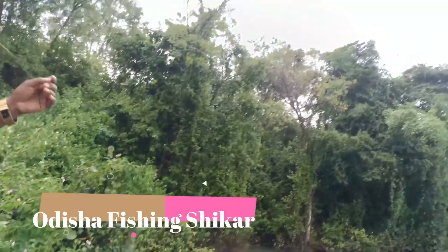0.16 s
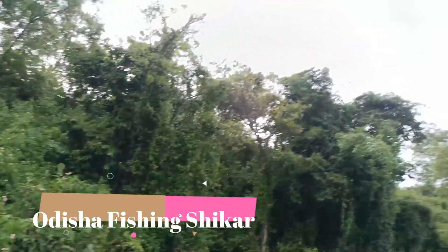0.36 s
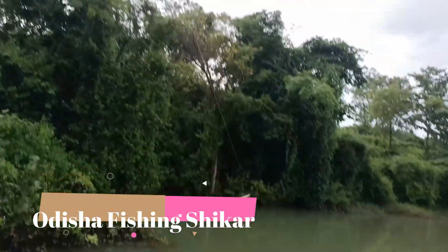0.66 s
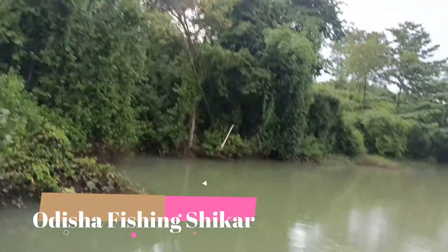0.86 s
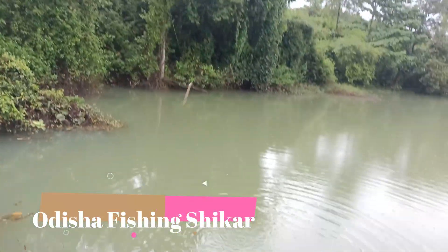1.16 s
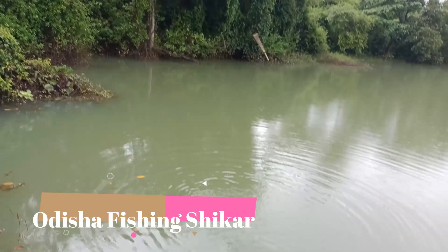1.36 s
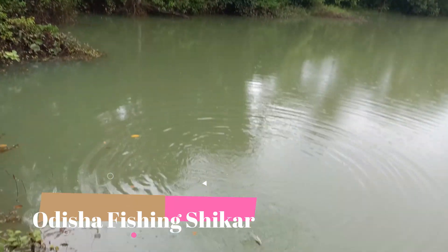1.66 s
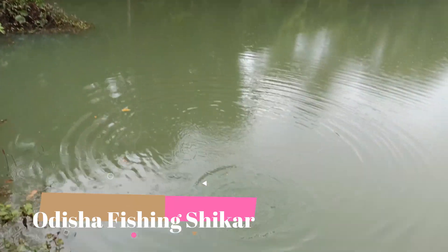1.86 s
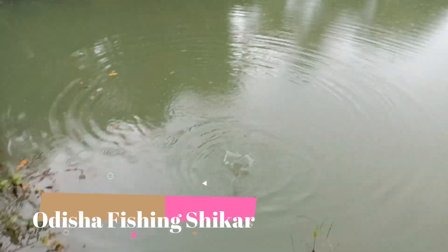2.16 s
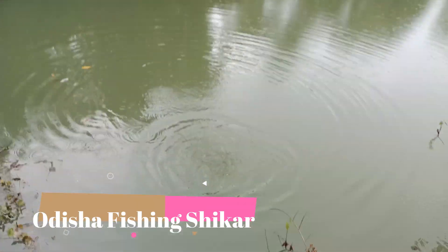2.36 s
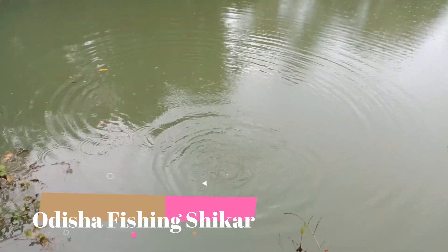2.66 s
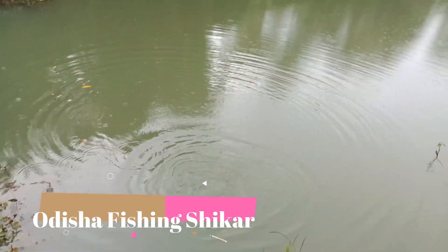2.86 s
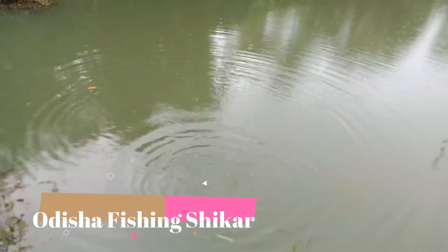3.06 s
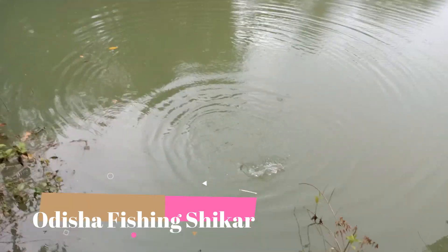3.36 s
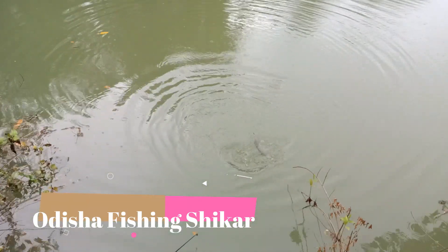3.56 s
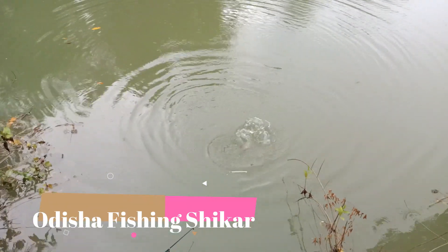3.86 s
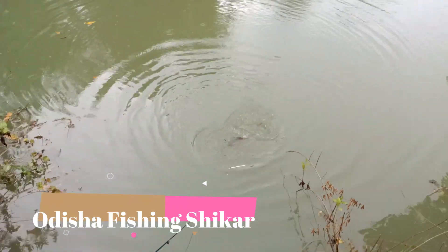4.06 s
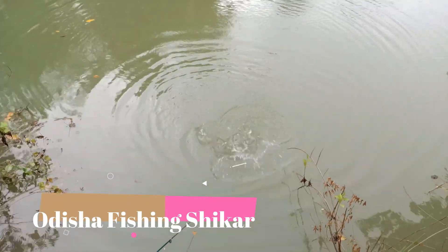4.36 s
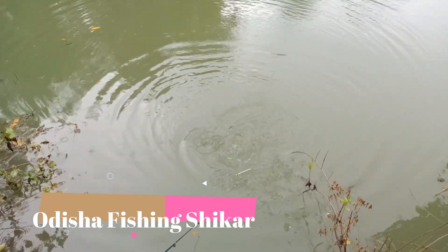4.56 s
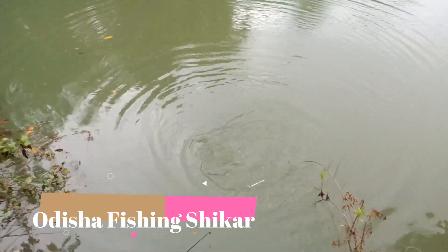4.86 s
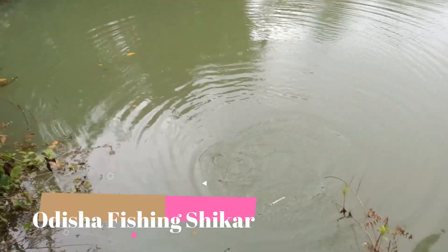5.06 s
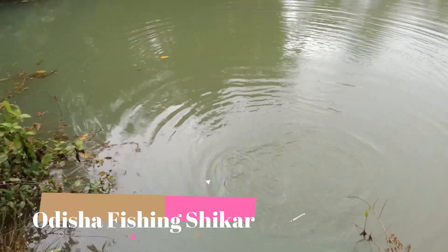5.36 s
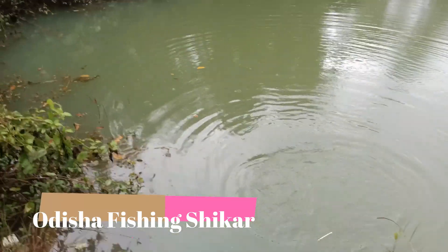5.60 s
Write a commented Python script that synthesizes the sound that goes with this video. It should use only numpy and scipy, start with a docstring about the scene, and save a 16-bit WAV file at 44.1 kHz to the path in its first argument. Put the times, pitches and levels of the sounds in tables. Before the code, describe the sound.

A hooked fish splashes and bubbles, line crackles, then a near reel ratchets in a rapid, uneven metallic buzz over a faint distant engine.

```python
"""Behind everything lie a river's filtered-noise hush and a far engine: a train of dull exhaust puffs. First a
hooked fish splashes (grainy noise bursts, ringing bubbles) while a fine crackle flares and tackle ticks. Then a
near fishing reel buzzes: each ratchet tooth gives a noise snap, a top-octave sizzle and body modes. The spool
surges and slackens pull by pull, and the levels swing with each turn. Soon something bumps the left microphone
and gusts brush the ports; the fish thrashes again under the buzz."""
import sys
import numpy as np
from scipy import signal
from scipy.fft import rfft, irfft, next_fast_len
from scipy.io import wavfile

SR = 44100
rng = np.random.default_rng(int(sys.argv[2]) if len(sys.argv) > 2 else 0)


def bounce(signal):
    """Save signal as a 16-bit WAV file at the path given by the first command-line argument."""
    frames = np.transpose(np.atleast_2d(signal))
    limited = np.clip(frames, -1, 1)
    pcm = np.round(limited * 32767).astype(np.int16)
    wavfile.write(sys.argv[1], SR, pcm)


N = 252693  # length [samples]

# Pulls on the line, each lasting until the next: (start [s], top speed [teeth/s], lean [above 1 builds
# slowly], left snap [dB], right snap [dB], sizzle [dB], low ring [dB], high ring [dB])
PULLS = [(1.491, 126.2, 1.17, -35, -38.5, -46, -39, -40), (1.666, 159.5, 0.64, -37, -36, -41, -37, -41),
         (1.79, 189.2, 1.64, -37.5, -37.5, -46, -39, -36.5),
         (1.949, 167.1, 1.46, -33.5, -34, -41.5, -35.5, -36), (2.088, 225.9, 1.6, -39, -38, -38, -32, -35),
         (2.209, 180.4, 1.48, -33, -34, -40, -40, -34.5), (2.368, 189.7, .8, -33.5, -27, -56, -35.5, -34),
         (2.598, 213.1, 0.7, -36, -26.5, -47, -41, -35), (2.771, 228.7, 1.65, -32, -26, -37, -35.5, -34.5),
         (2.968, 201.3, 1.98, -32.5, -27, -30, -40, -36.5), (3.11, 171.9, 0.58, -33, -28, -38, -38.5, -44),
         (3.243, 183.2, 2.03, -32, -27, -58, -40.5, -36.5),
         (3.407, 205, 0.82, -32.5, -26.5, -53, -35, -44.5), (3.509, 188.4, 2.02, -34.5, -29, -58, -43, -39),
         (3.685, 167.6, .62, -35, -27, -58, -44.5, -44.5),
         (3.807, 166.4, 1.55, -34.5, -29.5, -53, -35, -38.5),
         (3.945, 186.8, 0.67, -35.5, -25.5, -59, -36.5, -45),
         (4.09, 171.1, 1.45, -33, -28, -65, -38.5, -39.5),
         (4.209, 181.3, .79, -32.5, -28.5, -56, -39, -46.5),
         (4.32, 173.2, .46, -33.5, -29.5, -61, -36.5, -39), (4.478, 175.9, .68, -36, -28, -45, -35, -41),
         (4.674, 144.5, 0.79, -33, -30, -55, -37, -39.5), (4.765, 197.5, 0.76, -31, -27.5, -57, -31, -42.5),
         (4.924, 156.7, 0.95, -31, -29.5, -53, -34, -41),
         (5.073, 168.1, 0.71, -35, -31.5, -33.5, -30.5, -38.5),
         (5.32, 197, 0.64, -34.5, -33, -38, -32, -36), (5.44, 137.1, 1.17, -36, -34.5, -31, -39, -34.5),
         (5.691, 146.6, .78, -34, -36, -34, -33, -38)]
LAST_PULL_ENDS_S, SPIN_UP_S = 5.8, .028  # the spool starts from rest
SLACK_TEETH_PER_S, PULL_SHAPE = 92, .6  # the shape is an exponent on the effort
# Moments at which the reel begins a new turn: time [s]
TURN_STARTS = [1.596, 1.965, 2.259, 2.457, 2.723, 2.979, 3.255, 3.52, 3.795, 4.088, 4.347, 4.618, 4.889,
               5.173, 5.452, 5.767]
# Variation of left snap, right snap, sizzle, low ring and high ring, one row each: (change when slack [dB],
# once-a-turn swing [dB], its crest [turns], twice-a-turn swing [dB], its crest [turns])
SWINGS = [(-2.5, 3, 0.51, 0.66, 0.25), (-2.5, 0.5, .51, 0.5, 0.24), (-2.3, 0, 0.88, -0.5, 0.34),
          (-3.5, 1.55, 0.91, 1.4, 0.4), (-2, 1.35, 0.23, 0.8, 0.26)]
# Moments when the pawl bites differently: (time [s], right snap change [dB], sizzle change [dB])
BITES = [(1.72, 2.5, 1), (2.135, 5, -10), (2.335, 3, 0), (2.554, 3.5, 6), (2.645, 5.5, 1), (2.792, 3, 1),
         (2.925, 6, 5), (3.025, 2.5, -2), (3.182, 4.5, 9.5), (3.32, 2.5, 4), (3.442, 5, 0), (3.64, 2.5, 4),
         (3.915, 1, 0), (4.02, 1.5, 0), (4.19, 2.5, 0), (4.46, 5, 2), (4.67, 4.5, 1), (4.945, 7, 0),
         (5.11, 1, 9), (5.255, 1.5, 9.5), (5.375, -2, 11.5)]
BITE_WIDTH_S = 0.018
# Spectrum of the pawl's snap at each microphone: (frequency [Hz], relative gain [dB])
SNAP_LEFT = [(200, -28), (450, -30), (800, -26), (2400, -8), (3900, -6), (5400, -9), (6900, -18),
             (8100, -3), (9500, -.5), (11000, -4), (12500, -2), (13600, -10), (14600, -16)]
SNAP_RIGHT = [(200, -29), (450, -32), (900, -28), (2500, -11), (3200, -14), (3800, -9.5), (4250, -3),
              (4700, -3.5), (5300, 0), (7250, 1), (8100, -11), (9800, -22), (11600, -10), (13000, -9),
              (14500, -9), (15200, -5)]
# Vibration modes of the reel's body: (frequency [Hz], relative level [dB], t60 [s])
BODY_MODES = [(1025, -20, 0.027), (1180, -17.5, 0.028), (1478, -8, 0.016), (1658, -4.5, .016),
              (1904, -2, .019), (2086, -8.5, 0.017), (2303, -15.5, 0.032), (2750, -15, 0.017),
              (3630, -14.5, 0.0028), (4254, -19.5, 0.013)]
RING_SPLIT_HZ = 1750  # the low ring lies below, the high ring above
RING_WANDER_DB, RING_DRIFT_HZ = 1.5, 37.5  # smooth random wander of each mode's level and pitch
TOOTH_DETUNE_HZ = 26.8  # random spread of pitch from tooth to tooth
# How the reel is held: (time [s], ring level left minus right [dB])
GRIP = [(1.5, -1), (4.0, -1.5), (4.55, -0.5), (5.18, -0.5), (5.5, -5), (5.73, -2.5)]
# Small ticks of the tackle: (time [s], peak level [dB], centre [Hz])
TICKS = [(.394, -47, 6000), (.42, -48, 5500), (.446, -42, 1430), (.451, -50, 1400), (.475, -44, 6500),
         (.544, -49, 9000), (.556, -52, 7000), (.598, -44, 2400), (.635, -51, 10900), (.706, -49, 6500),
         (.716, -50, 5950), (0.747, -47, 3740), (1.039, -44, 6200), (1.322, -32, 1830), (1.362, -29, 2150),
         (2.98, -40, 1020), (3.156, -51, 700), (3.307, -33.5, 1014)]
TICK_T60_S = 0.013
# Flares of fine treble crackle: (time [s], crackle level [dB], t60 [s])
CRACKLES = [(.436, -54, 0.22), (.535, -59, .1), (.7, -57, 0.17), (.865, -59, 0.14), (1.07, -55, 0.84),
            (1.32, -39.5, 0.13), (1.355, -41.5, 0.19)]
CRACKLE_RISE_S = 0.012
# Spectrum of the crackle: (frequency [Hz], relative gain [dB])
CRACKLE_COLOUR = [(1000, -64), (3000, -11), (6500, 10), (10500, -8), (15000, -1)]
# Louder bubbles left by the fish: (time [s], pitch [Hz], relative level [dB], glide [octaves per t60], t60 [s])
BUBBLES = [(.522, 2000, -41, 0.1, .04), (.623, 414, -42, 0.1, 0.087), (.657, 810, -44, -0.15, 0.063),
           (.672, 1510, -41, 0, 0.036), (.71, 2630, -40, .02, 0.036), (.713, 1660, -32, .18, .023),
           (.731, 1510, -35.5, -0.1, 0.041), (.745, 3620, -45, 0, 0.043), (.752, 2880, -41, -0, 0.027),
           (.752, 2060, -45, -.05, .05), (0.981, 977, -33.5, 0.3, 0.033), (1.04, 470, -38.5, 0, 0.064),
           (1.051, 730, -37, .37, .043), (1.061, 910, -27.5, -0, 0.036), (1.066, 422, -39, -0.13, 0.12),
           (1.083, 890, -33, 0.13, 0.035), (1.118, 1670, -33, 0.07, .03), (1.147, 1090, -35, -0, 0.042),
           (1.238, 1400, -24.5, -0, 0.025), (1.329, 750, -25.5, -0.08, 0.038), (1.38, 2240, -23, 0.05, .02),
           (1.409, 1317, -25, 0.63, 0.034), (2.179, 762, -27, .33, 0.039), (2.203, 903, -29.5, 0.25, 0.03),
           (2.267, 1160, -30, .2, 0.035), (3.828, 633.2, -15.5, 0.27, 0.023), (3.848, 234.7, -40, 0, .04),
           (3.872, 738, -20.5, -0.01, .036), (3.872, 316, -28.5, -0.3, 0.091), (3.917, 545.7, -42, 0, .05),
           (3.966, 339, -39, 0.65, 0.087), (4.007, 609.4, -24, 0.28, 0.052), (4.04, 689, -28, 0.7, 0.049),
           (4.272, 651.6, -24, 0.3, 0.028), (4.332, 650, -42, 0.2, 0.048), (4.343, 1120, -32, .05, 0.031),
           (4.381, 690, -30.5, .1, 0.053), (4.402, 650, -28, 0.22, 0.036),
           (4.403, 333.7, -34.5, 0.08, 0.17), (4.432, 333, -36, .13, .08), (4.428, 607, -30, 0.17, 0.041),
           (4.471, 804, -19.5, -0.02, 0.031), (4.48, 642, -30, 0.14, 0.039),
           (4.56, 340.6, -43.5, .1, 0.043), (4.563, 879.7, -37.5, 0.09, 0.047)]
# Slaps and spray on the water: (time [s], relative level [dB], centre [Hz], t60 [s], rise [s])
SPLASHES = [(.444, -35.5, 1460, 0.1, 0.003), (.489, -54, 1465, 0.43, .022),
            (0.572, -51.5, 2480, 0.095, 0.029), (0.645, -55, 1254, 0.2, 0.028),
            (0.701, -59, 2820, 0.2, 0.025), (.834, -51, 220, 0.15, 0.036), (.955, -55, 1000, 0.085, 0.017),
            (1.047, -38.5, 894, 0.086, 0.023), (1.118, -49, 1720, 0.092, 0.0051),
            (1.228, -46.5, 1710, 0.07, 0.01), (1.268, -57, 1290, 0.14, .015),
            (1.425, -55.5, 1610, 0.29, .01), (1.324, -38, 1790, 0.053, 0.0051),
            (1.342, -46, 1930, 0.44, 0.0072), (1.361, -44.5, 2170, 0.11, 0.0018),
            (3.157, -37, 330, 0.032, .004), (3.307, -45, 748, 0.014, 0.0042),
            (3.828, -30.5, 612.5, 0.013, 0.0057), (3.872, -47, 626, 0.27, 0.0083),
            (3.975, -43.5, 688.2, 0.22, 0.016), (4.266, -42.5, 1114, 0.15, 0.014),
            (4.381, -45.5, 720, 0.17, 0.03), (4.475, -41.5, 910, 0.22, .0086)]
# A hollow between the deep plops and the gurgle: (frequency [Hz], gain [dB])
WATER_COLOUR = [(340, -0.5), (480, -7.5), (600, 0)]
# The distant engine: (time [s], firing rate [1/s], level before mixing tone and rasp [dB])
ENGINE = [(0, 15, -51.5), (.5, 15.5, -58.5), (1.5, 11.74, -59), (4.2, 12.5, -56.5), (5.73, 12.46, -55)]
# Spectrum of the exhaust's rasp: (frequency [Hz], relative gain [dB])
EXHAUST_COLOUR = [(30, -55), (70, -4.5), (105, 0.5), (140, -2), (190, -2), (300, -24.5), (800, -50)]
# The riverbank's hush: (time [s], level [dB])
HUSH = [(0, -48.5), (.22, -51.5), (.3, -55.5), (.8, -56.5), (5.73, -56.5)]
# Spectrum of the hush: (frequency [Hz], relative gain [dB])
AIR_COLOUR = [(50, -16), (150, -11.5), (400, -5.5), (1100, -8), (2100, -10), (3300, -28), (5000, -26.5),
              (8000, -36.5), (15800, -53)]
# Gusts on the microphone ports: (time [s], left level [dB], right level [dB])
GUSTS = [(2.791, -65, -40), (2.9, -49, -86)]
GUST_WIDTH_S, BREEZE_DB = 0.036, -64.5
TOP_HZ = 15850  # upper band limit


def amp(db):
    """Level law: decibels to amplitude gain."""
    return 10 ** (np.asarray(db) / 20)


def unit(x):
    """Normalisation: scale to rms 1."""
    return x / np.sqrt(np.mean(x ** 2) + 1e-20)


def curves(rows, when=None):
    """Linear interpolation: each column after the time, at given moments or at every sample."""
    s, *columns = np.transpose(rows)
    if when is None:
        when = np.arange(N) / SR
    return [np.interp(when, s, column) for column in columns]


def sides(db):
    """Intensity panning: left and right gains of constant total power for a level difference."""
    gains = amp(np.array([db, -db]) / 2)
    return gains / np.sqrt(np.mean(gains ** 2, axis=0))


def colour(x, points):
    """Minimum-phase filtering: a causal response through (frequency [Hz], gain [dB]) points."""
    size = 2 * next_fast_len(x.shape[-1])
    f, db = np.transpose(points)
    gain = amp(np.interp(np.log(np.fft.rfftfreq(size, 1 / SR) + 1), np.log(f), db))
    # folding the cepstrum onto positive time makes the filter causal
    cepstrum = irfft(np.log(gain))
    cepstrum[1:size // 2] *= 2
    cepstrum[size // 2 + 1:] = 0
    return irfft(rfft(x, size) * np.exp(rfft(cepstrum)))[..., :x.shape[-1]]


def place(times, sounds):
    """Superposition: sum stereo sounds (2, events, samples) at their moments."""
    starts = np.round(np.asarray(times) * SR).astype(int)[:, None]
    at = starts + np.arange(sounds.shape[-1])
    return np.array([np.bincount(at.ravel(), s.ravel(), N)[:N] for s in sounds])


def drift(times, rate, size):
    """Smoothed randomness: rows of random values that change smoothly, rate times a second."""
    knots = np.arange(int(N / SR * rate) + 2)
    weight = np.exp(-2 * (times[:, None] * rate - knots) ** 2)
    weight = weight / np.linalg.norm(weight, axis=1, keepdims=True)
    return weight @ rng.standard_normal((2, len(knots), size))


def reel():
    """Ratchet excitation: each tooth gives a snap, a sizzle and a ring, heard first at the left microphone."""
    times = teeth(jitter_s=.00015)
    speed, effort, levels = pulling(times)
    turns = np.interp(times, TURN_STARTS, np.arange(len(TURN_STARTS)))
    left_db, right_db, sizzle_db, low_db, high_db = levels + swings(turns, effort)
    bite_db, bright_db = sum(np.outer([snap_db, top_db], np.exp(-((times - s) / BITE_WIDTH_S) ** 2))
                             for s, snap_db, top_db in BITES)
    # the power is shared among uneven teeth
    blow = (np.sqrt(SR / speed) * amp(0.8 * rng.standard_normal(len(times))))[:, None]

    click = blow * snaps(times, fresh=.28, settle_s=.012, apart=.55, rise_s=.0012, hold_s=.0007,
                         crack_t60=.0042, tail_db=-9.5, tail_t60=.058, patchy_db=1.1)
    left, right = place(times, click * amp([left_db, right_db + bite_db])[..., None])
    snap = np.array([amp(10.0) * colour(left, SNAP_LEFT), amp(8) * colour(right, SNAP_RIGHT)])

    # the top octave dies first, by an added decay of t60 0.06 s
    fade = amp(-60 * np.arange(click.shape[-1]) / SR / .06)
    sizzle = place(times, click * fade * amp(sizzle_db + bright_db)[:, None])
    sizzle = colour(sizzle, [(8000, -19), (11500, 1.5), (13000, 2.5), (15200, 13.5)])

    ring = rings(times, low_db, high_db, scatter=.45, attack_s=.0019)
    balance = amp(rng.standard_normal(len(times))) * sides(curves(GRIP, times)[0])
    ring = place(times, ring * blow * balance[..., None])
    ring = colour(ring, [(900, -2), (1400, 0.5), (2200, -0.5), (3000, 4.0)])

    left, right = snap + sizzle * sides(-13.5)[:, None] + ring
    lag = round(.00047 * SR)
    return np.array([left, np.pad(right, (lag, 0))[:N]])


def teeth(jitter_s):
    """Integrated rotation: a tooth passes the pawl whenever the summed speed reaches a whole number."""
    t = np.arange(round(PULLS[0][0] * SR), N) / SR
    spin_up = 1 - np.exp(-(t - t[0]) / SPIN_UP_S)
    turned = np.cumsum(pulling(t)[0] * spin_up) / SR
    times = np.interp(np.arange(int(turned[-1]) + 1), turned, t)
    return times + jitter_s * rng.standard_normal(len(times))


def pulling(when):
    """Speed follows effort: each pull swells from slack to its top and eases; also gives effort and levels."""
    start, top, lean, *levels = np.transpose(PULLS)
    order = np.arange(len(start))
    progress = np.interp(when, np.append(start, LAST_PULL_ENDS_S), np.arange(len(start) + 1))
    pull = np.minimum(progress.astype(int), order[-1])
    effort = np.abs(np.sin(np.pi * (progress % 1) ** lean[pull]))
    speed = SLACK_TEETH_PER_S + effort ** PULL_SHAPE * (top[pull] - SLACK_TEETH_PER_S)
    return speed, effort, np.array([np.interp(progress - .5, order, db) for db in levels])


def swings(turns, effort):
    """Periodic modulation: levels sag when the line is slack and swing with every turn of the reel."""
    slack_db, once_db, once_at, twice_db, twice_at = np.transpose(SWINGS)[..., None]
    once = once_db * np.cos(2 * np.pi * (turns - once_at))
    twice = twice_db * np.cos(2 * np.pi * 2 * (turns - twice_at))
    return slack_db * (1 - effort) + once + twice


def snaps(times, fresh, settle_s, apart, rise_s, hold_s, crack_t60, tail_db, tail_t60, patchy_db):
    """Impact noise: the pawl scrapes off a tooth and cracks down like its neighbours; later chatter is new."""
    t = np.arange(SR // 43) / SR
    alike = np.clip(1 - fresh, 0, 1) * np.exp(-(t / settle_s) ** 2)
    shared = np.sqrt(alike) * drift(times, 15, size=len(t))
    new = np.sqrt(1 - alike) * rng.standard_normal((2, len(times), len(t)))
    near, far = shared + new
    chatter = np.array([near + apart * far, near - apart * far]) / np.hypot(1, apart)
    # the colour wanders as the reel moves in the hand, and differs a little from tooth to tooth
    spectrum = rfft(chatter)
    patches = drift(times, 17, size=18)[0] + rng.standard_normal((len(times), 18))
    patches = signal.resample(patches, spectrum.shape[-1], axis=1)
    patches = patches - patches.mean(axis=1, keepdims=True)
    chatter = irfft(spectrum * amp(patchy_db * patches), len(t))
    after = np.maximum(t - rise_s - hold_s, 0)
    decay = amp(-60 * after / crack_t60) + amp(tail_db - 60 * after / tail_t60)
    shape = np.minimum(t / rise_s, 1) ** 2 * decay
    return chatter * shape / np.linalg.norm(shape)


def rings(times, low_db, high_db, scatter, attack_s):
    """Modal resonance: each snap rings the reel's body; the hand damps now one mode, now another."""
    t = np.arange(SR // 40) / SR
    out = 0
    for hz, db, t60 in BODY_MODES:
        turn, damp = drift(times, 18, size=1)
        shift = RING_DRIFT_HZ * drift(times, 12, size=1)[0]
        group_db = low_db if hz < RING_SPLIT_HZ else high_db
        level = group_db[:, None] + db + RING_WANDER_DB * damp
        phase = turn + scatter * rng.standard_normal((2, len(times), 1))
        pitch = hz + shift + TOOTH_DETUNE_HZ * rng.standard_normal((len(times), 1))
        decay = amp(-60 * t / t60) * (1 - np.exp(-(t / attack_s) ** 2))
        out = out + amp(level) * unit(decay) * np.sin(2 * np.pi * pitch * t + phase)
    return out * np.sqrt(2 / len(t))


def ticks():
    """Damped impact: each tick is a very short noise burst around its own centre frequency."""
    t = np.arange(SR // 30) / SR
    bursts = []
    for s, db, hz in TICKS:
        burst = rng.standard_normal(len(t)) * amp(-60 * t / TICK_T60_S)
        burst = colour(burst, [(hz / 4, -25), (hz / 1.2, -6), (hz, 0), (hz * 1.1, -9), (hz * 4, -30)])
        burst = burst * np.ones((2, 1))  # alike on both sides
        bursts.append(burst / np.abs(burst).max() * amp(db))
    return place([row[0] for row in TICKS], np.stack(bursts, axis=1))


def crackle():
    """Granular noise: a fine crackle of tiny grains flares up at each listed moment and fades."""
    t = np.arange(N) / SR
    grain_db = 4.2 * signal.resample(rng.standard_normal(N // 60), N)
    grains = rng.standard_normal((2, N)) * amp(grain_db)
    strain = 0
    for s, db, t60 in CRACKLES:
        decay = amp(db - 60 * np.maximum(t - s - CRACKLE_RISE_S, 0) / t60)
        strain = strain + np.clip((t - s) / CRACKLE_RISE_S, 0, 1) * decay
    return unit(colour(grains, CRACKLE_COLOUR)) * strain * sides(-8)[:, None]


def bubbles():
    """Bubble resonance: trapped air rings as it decays, most often rising in pitch near the surface."""
    s, hz, db, glide, t60 = np.transpose(BUBBLES)[..., None]
    t = np.arange(SR // 5) / SR
    pitch = hz * 2 ** (glide * np.minimum(t / t60, 1))
    phase = 2 * np.pi * np.cumsum(pitch, axis=1) / SR
    size = amp(db + 1.5 - 60 * t / t60) * (1 - np.exp(-(t / 0.0036) ** 2))
    lag_s = 0.00004  # the left microphone hears them later
    left = size * np.sin(phase - 2 * np.pi * hz * lag_s)
    return place(s[:, 0], np.array([left, size * np.sin(phase)]))


def splashes():
    """Impact on water: grainy noise broad around its centre, with bass alike at both microphones."""
    t = np.arange(SR // 4) / SR
    bursts = []
    for s, db, hz, t60, rise_s in SPLASHES:
        grain_db = 4.0 * signal.resample(rng.standard_normal(200), len(t))
        spray = rng.standard_normal((2, len(t))) * amp(grain_db)
        mid, side = colour(spray, [(hz / 5, -26), (hz / 1.76, -11), (hz / 1.2, 0), (hz * 1.0, 0),
                                   (hz * 1.58, -17), (hz * 9, -42)])
        side = side * np.clip(hz / 2000, 0, 1)
        noise = np.array([mid + side, mid - side]) / np.std(mid)
        decay = amp(db - 2.0 - 60 * np.maximum(t - rise_s, 0) / t60)
        swell = np.minimum(t / rise_s, 1) ** 0.35 * decay
        bursts.append((noise + droplets(t, hz, count=32)) * swell)
    return place([row[0] for row in SPLASHES], np.stack(bursts, axis=1))


def droplets(t, hz, count):
    """Bubble resonance in miniature: rising pings at random moments inside a splash."""
    age = np.maximum(t - t[-1] * rng.random((count, 1)), 0)
    pitch = hz * np.exp(0.458 * rng.uniform(-0.98, 1, (count, 1)))
    pings = amp(-60 * age / 0.062) * np.sin(2 * np.pi * pitch * age * (1 + 3 * age))
    return np.sum(1.7 * pings, axis=0)


def bank_echo(x, t60, db):
    """Diffuse reflection: bushes and the bank scatter a faint, short tail."""
    t = np.arange(SR // 3) / SR
    tail = rng.standard_normal((2, len(t))) * amp(-60 * t / t60) * (t > .004)
    tail = tail / np.linalg.norm(tail[0])
    return x + amp(db) * signal.fftconvolve(x, tail, axes=1)[:, :N]


def bump(at_s, width_s, scuff_db):
    """Contact noise: a knock on the left microphone port, a hollow thump inside a short scuff."""
    t = np.arange(N) / SR - at_s
    push = rng.standard_normal(N) * np.exp(-abs(t) / width_s)
    scuff = colour(push, [(20, -7), (50, 4.5), (150, -8.5), (225, 0.5), (285, -3.5), (380, -1.5),
                          (500, -11), (680, -8.5), (1100, -9.5), (1700, -24), (5000, -30)])
    scuff = scuff / np.linalg.norm(scuff) * np.sqrt(width_s * SR) * amp(scuff_db)
    thump = amp(-10.5) * np.exp(-(t / 0.0025) ** 2) * np.cos(2 * np.pi * 350 * t)
    return (scuff + thump) * amp([[0], [-19]])  # weaker on the right


def engine():
    """Pulse-train excitation: every firing is a short, dull puff from a far exhaust."""
    rate, db = curves(ENGINE)
    cycles = np.cumsum(rate) / SR + 0.613
    firings = np.diff(np.floor(cycles), prepend=0)
    t = np.arange(SR // 8) / SR
    puff = amp(-60 * t / 0.076) * (1 - np.exp(-t / 0.015))
    tone = unit(signal.fftconvolve(firings, puff * np.sin(2 * np.pi * 138 * t))[:N])
    puffs = signal.fftconvolve(firings, puff)[:N]
    rasp = unit(colour(puffs * rng.standard_normal(N), EXHAUST_COLOUR))
    return amp(db) * (amp(-4.5) * tone + amp(-9.5) * rasp)


def riverbank():
    """Broadband turbulence: a soft outdoor hush, and light air with brief gusts on each port."""
    t = np.arange(N) / SR
    mid, side = colour(rng.standard_normal((2, N)), AIR_COLOUR)
    side = colour(side, [(200, -8.0), (700, -4.5), (1300, 2.5)])
    right = colour(mid - side, [(1300, -2.0), (4400, 7.0), (15000, 12.5)])
    hush = unit(np.array([mid + side, right]))
    wind = rng.standard_normal((2, N))
    wind = unit(colour(wind, [(15, -30), (45, -14.0), (80, -18.5), (200, -29.5), (1000, -43.5)]))
    gusts = sum(amp([[left_db], [right_db]]) * np.exp(-((t - s) / GUST_WIDTH_S) ** 2)
                for s, left_db, right_db in GUSTS)
    return hush * amp(curves(HUSH)[0]) + wind * (amp(BREEZE_DB) + gusts)


def scene():
    """Superposition of the near reel, the fish further out, and the background."""
    ratchet = bank_echo(reel(), t60=.05, db=-10)
    water = bubbles() + colour(splashes(), WATER_COLOUR)
    fish = bank_echo(water, t60=0.15, db=-12.5)
    knock = bump(at_s=2.3516, width_s=0.0076, scuff_db=-16.0)
    return ratchet + ticks() + crackle() + fish + knock + engine() + riverbank()


def record(dry):
    """Band limitation: a steep low-pass removes everything above the upper band limit."""
    size = next_fast_len(N + SR // 2)
    # the gain falls from 1 to 0 over 250 Hz
    passed = np.clip((TOP_HZ - np.fft.rfftfreq(size, 1 / SR)) / 250 + .5, 0, 1)
    return irfft(rfft(dry, size) * passed, size)[:, :N]


dry = scene()
out = record(dry)
bounce(out)
```